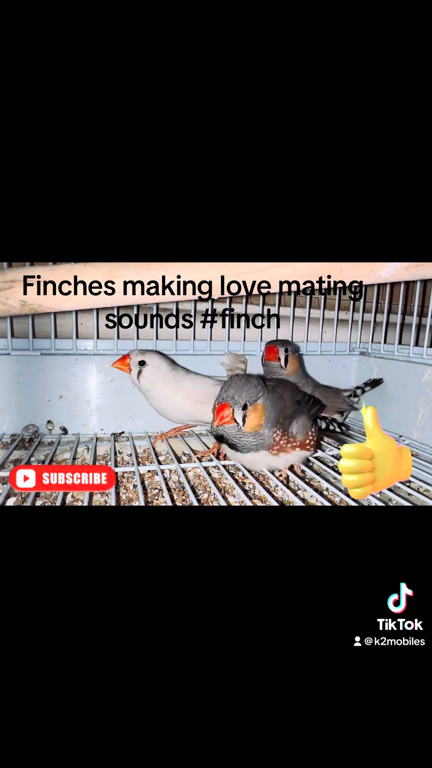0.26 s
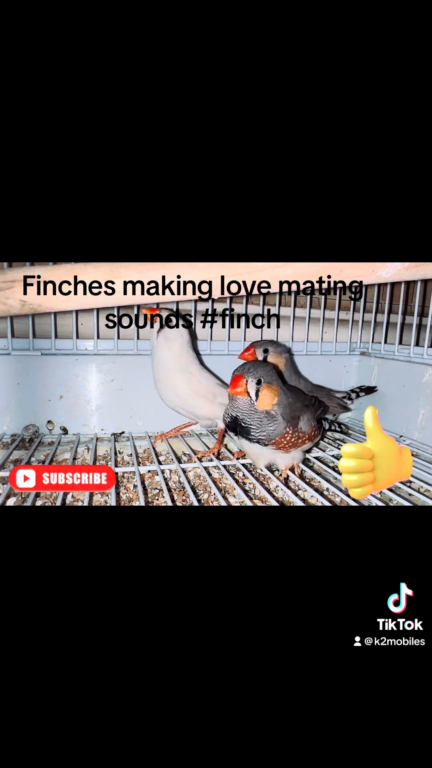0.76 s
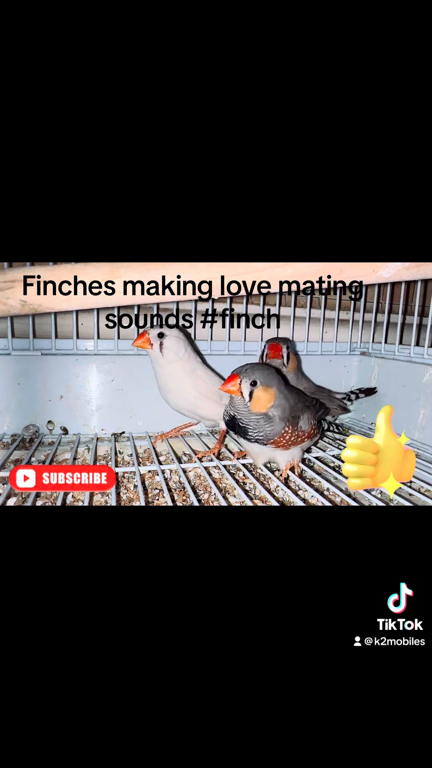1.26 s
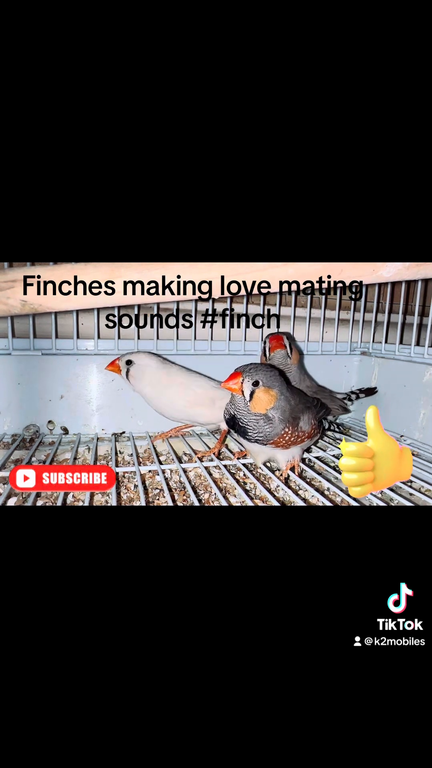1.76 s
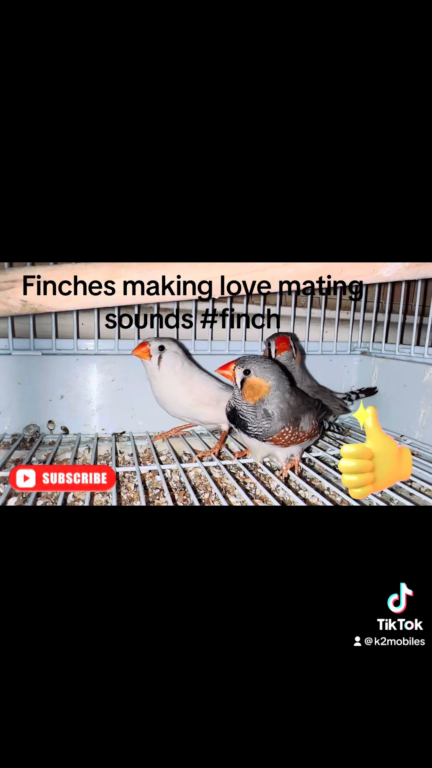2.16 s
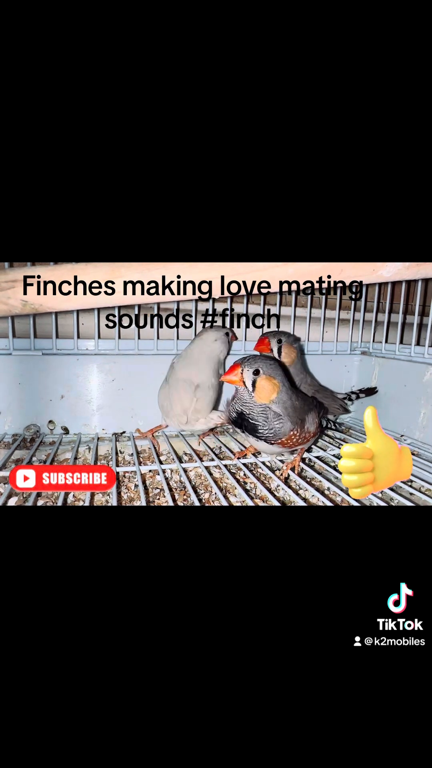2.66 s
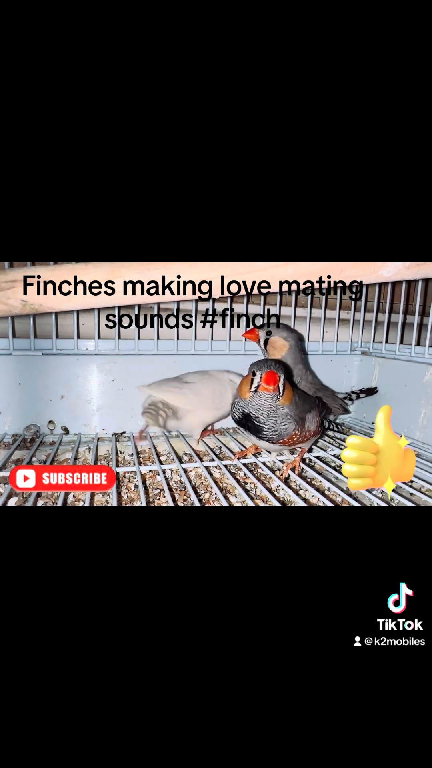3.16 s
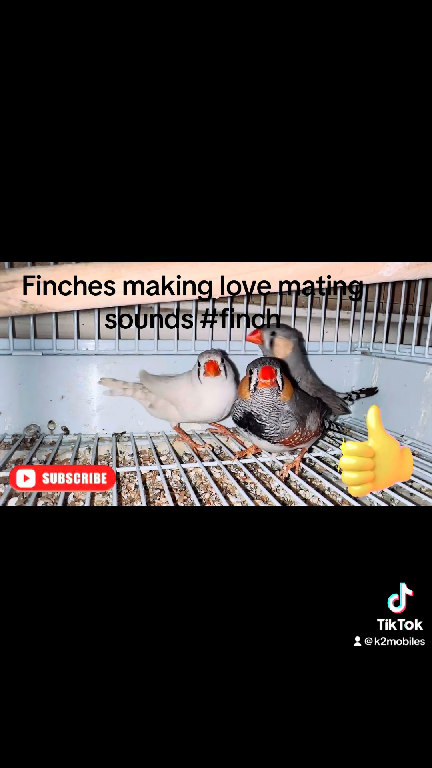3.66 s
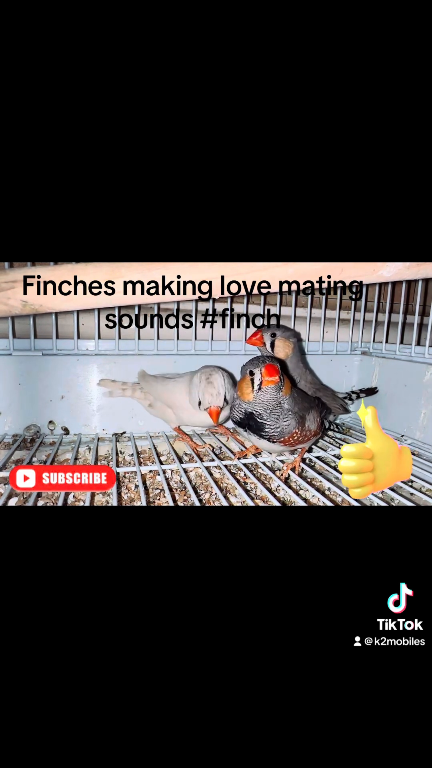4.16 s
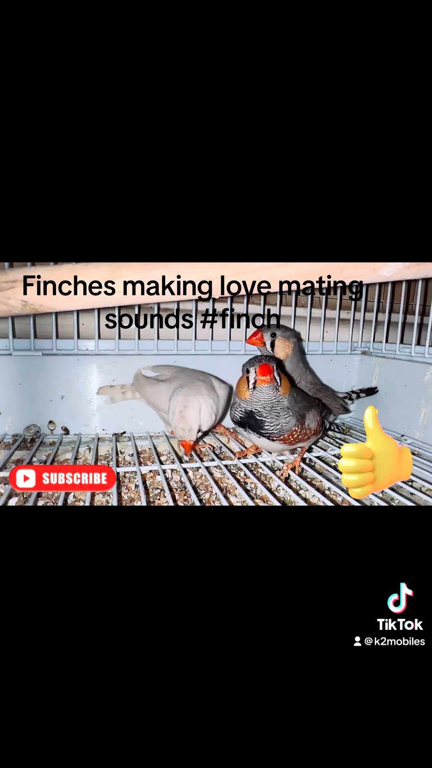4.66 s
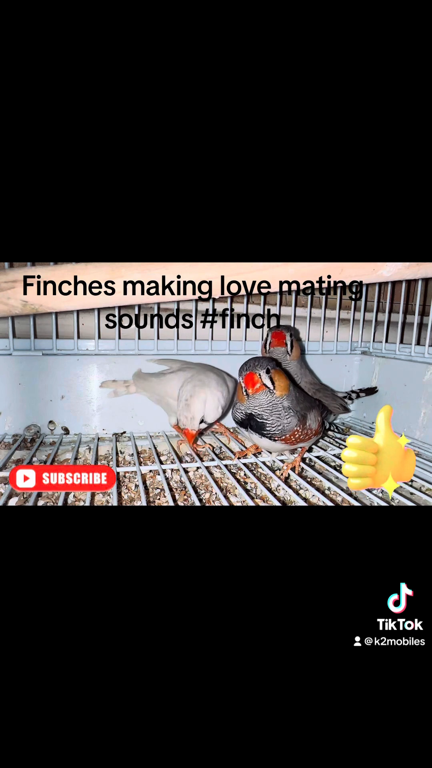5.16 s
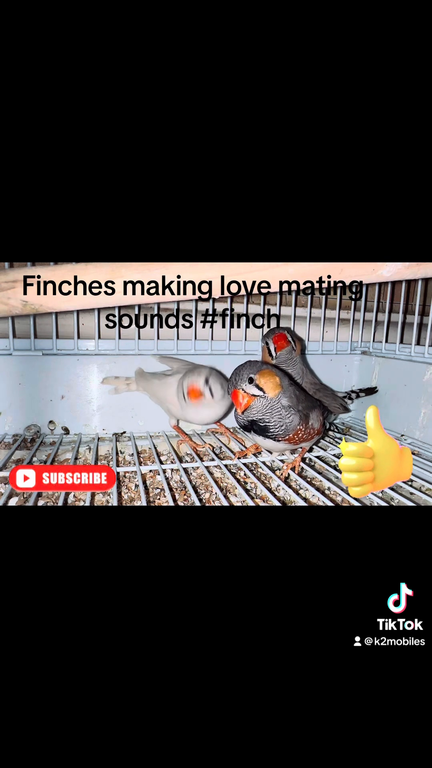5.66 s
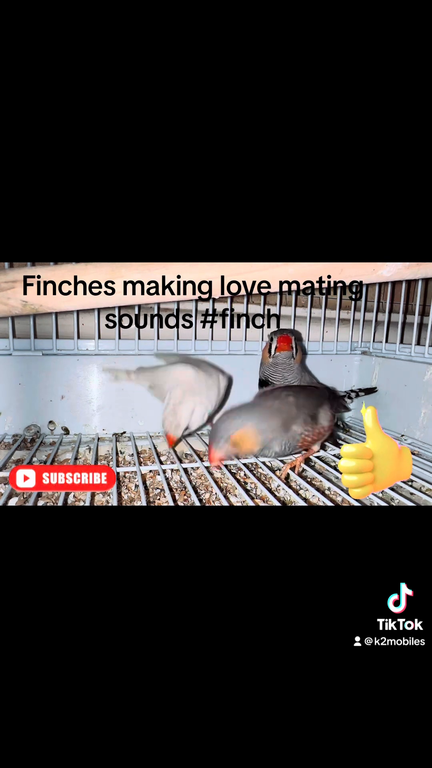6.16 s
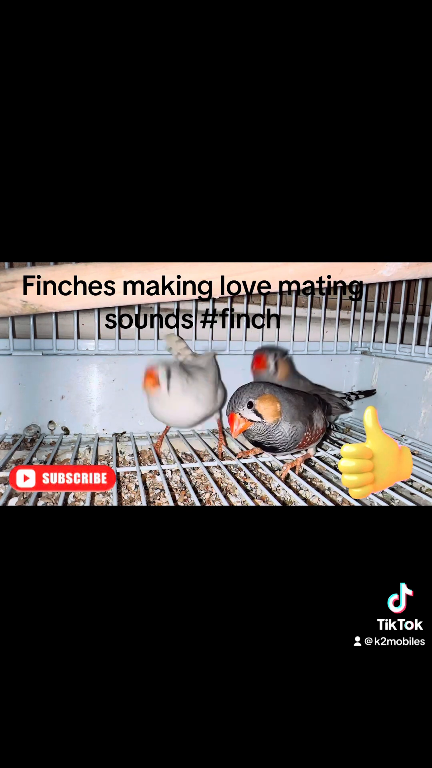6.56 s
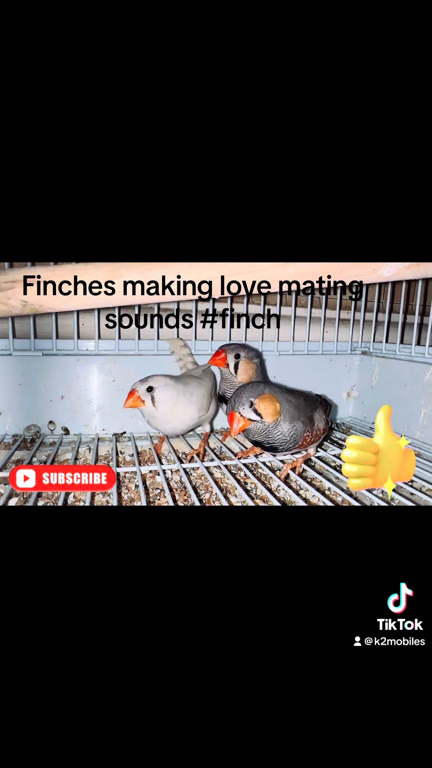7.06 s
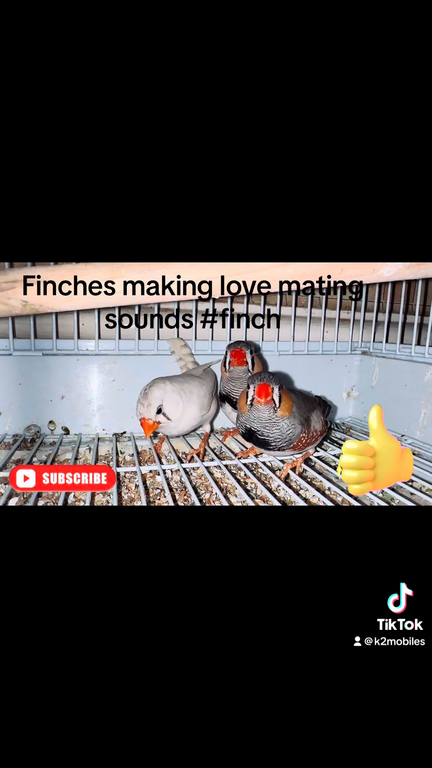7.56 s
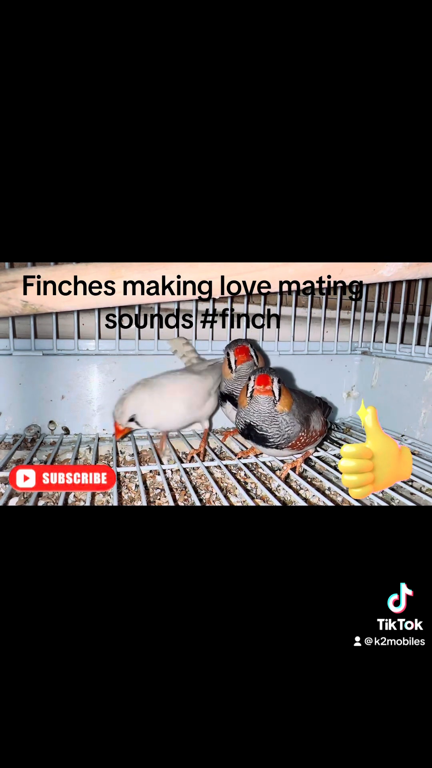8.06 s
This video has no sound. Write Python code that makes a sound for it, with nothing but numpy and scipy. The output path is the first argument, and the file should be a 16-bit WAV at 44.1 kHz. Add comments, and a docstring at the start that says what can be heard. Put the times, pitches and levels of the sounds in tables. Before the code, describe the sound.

Close up, finches hop and scrabble on a ringing wire cage floor, with brief nasal calls early on and a soft hum and floor booms beneath.

```python
"""Caged finches indoors

Small finches in a wire cage, close to a phone: nasal stacked calls and a two-voiced falling chirp (overtone
stacks with breath), hops and pings that ring the cage (damped sines), claw ticks and scrabbling (shaped noise).
Behind them a mains hum (one sine), footfalls booming through the floor (tones that beat), a low building
rumble and the hush of a small room with fading tails of cage clatter (coloured noise)."""
import sys
import numpy as np
from scipy import signal
from scipy.fft import rfft, irfft, next_fast_len
from scipy.io import wavfile
from scipy.ndimage import uniform_filter1d, map_coordinates

SR = 44100
rng = np.random.default_rng(int(sys.argv[2]) if len(sys.argv) > 2 else 0)


def master(y):
    """Save y as 16-bit WAV."""
    cut = np.clip(np.atleast_2d(y).T, -1, 1)
    pcm = np.round(cut * 32767)  # scale
    wavfile.write(sys.argv[1], SR, pcm.astype(np.int16))


N = 366912  # length in samples
TOP_HZ = 16500  # nothing sounds above this

# colour of the building's low noise: [f/Hz, level/dB]
RUMBLE_COLOUR = [(15, -53), (25, -14.5), (32, -6), (42, -11.5), (70, -10), (85, 2.5), (105, 2), (125, -4),
                 (170, -35), (300, -120)]

# colour of the hush: [f/Hz, level/dB]
HUSH_COLOUR = [(90, -47), (150, -14.5), (260, -22), (345, -22.5), (480, -33), (700, -27), (990, -35.5),
               (1890, -36), (4890, -48.5), (6370, -44), (8630, -52.5), (10800, -62), (13200, -57),
               (16500, -83.5)]
# the hush with the fading tails of cage clatter, above 300 Hz, before the lean: [t/s, level/dB]
HUSH_LEVEL = [(0.0, -72.5), (0.69, -73.5), (1.41, -77), (2.1, -76), (2.59, -75), (3.0, -75), (4.38, -77.5),
              (5.21, -73.5), (5.63, -76), (6.16, -75.5), (6.28, -62.5), (6.46, -75.5), (8.11, -76.5),
              (8.32, -70.5)]
# left-right likeness, before the lean: [f/Hz, correlation -1 to 1]
HUSH_LIKENESS = [(60, 0.38), (130, 0.71), (290, 0.98), (640, 0.21), (1410, -0.25), (3100, 0.094),
                 (6820, -0.063), (15000, -0.59)]
# left over right: [f/Hz, level/dB]
HUSH_LEAN = [(60, -0.5), (130, 2), (290, 1), (640, -1.0), (1410, 4.5), (3100, 5), (6820, 9), (15000, -9)]
# how much it comes and goes: [f/Hz, depth/dB]
HUSH_PATCHES = [(200, 4.5), (800, 2.5), (2500, 0.5)]

# footfalls and jolts through the floor: [t/s of the peak, level/dB, t60/s]
THUDS = [(.005, -57, 0.51), (.18, -57, .6), (0.339, -53.5, 2), (0.721, -53.5, 5.2), (1.27, -54.5, 0.93),
         (1.779, -66, 0.81), (2.22, -63, 0.53), (2.619, -55.5, .7), (2.99, -43.5, 1.8), (3.55, -43.5, 1.7),
         (4.099, -45.5, 2.7), (4.692, -52.5, 3.2), (5.011, -47, 0.075), (5.1, -57, 0.31),
         (5.4, -50.5, 0.95), (5.79, -52.5, 2.4), (6.331, -53, 1), (6.7, -55, 0.27), (6.839, -57, 1.1),
         (7.412, -48.5, 2), (8.02, -40.5, 1.9), (8.085, -41, 0.87)]
# two close tones that beat, and a deep push: [f/Hz, level/dB, share of the thud's t60]
FLOOR_TONES = [(56.36, -4, 0.79), (62.87, -9.5, 1), (35.8, -11.5, 0.34)]
FLOOR_SCATTER_HZ = 0.6  # the tones shift a little from step to step
THUD_RISE_S = 0.23  # time to climb 60 dB
MURMUR_DB, MURMUR_SWING_DB = -70, 4.5  # the faint restless boom between thuds

# scrabbling feet and feathers: [t/s of the peak, treble level/dB, body level/dB, body t60/s]
SCRABBLE_BURSTS = [(.005, -70, -63, 1.4), (.09, -70.5, -80, 0.38), (.13, -66.5, -63.5, 0.27),
                   (.149, -77, -47.5, 0.14), (0.255, -82, -56.5, 0.12), (0.474, -76.5, -64.5, .5),
                   (.506, -69, -76, .06), (.696, -60.5, -51.5, 0.19), (1.588, -70.5, -72.5, 0.31),
                   (2.38, -76.5, -92, 0.034), (2.457, -55, -55.5, 0.28), (2.478, -53.5, -48.5, 0.46),
                   (2.534, -56.5, -58, 0.047), (2.98, -83, -66.5, .15), (3.044, -87, -68.5, 0.09),
                   (3.19, -71.5, -62, 1.06), (3.275, -61, -55.5, 0.089), (3.287, -75, -51, 0.078),
                   (4.55, -59, -51, 0.077), (4.63, -76.5, -74, .09), (4.954, -80.5, -60.5, 1.1),
                   (5.067, -70, -66.5, 0.094), (5.162, -88, -83, 0.071), (5.329, -69.5, -55, 0.21),
                   (5.484, -67.5, -84, 0.082), (6.11, -75, -62.5, 0.71), (6.146, -67, -47.5, .03),
                   (6.17, -63.5, -61, 0.92), (6.2, -66, -66.5, 0.41), (6.222, -58, -46.5, .07),
                   (6.239, -65, -56.5, 0.2), (6.558, -76, -75.5, .6), (6.62, -77.5, -68, 0.67),
                   (6.674, -58, -61, 0.13), (6.806, -77, -70.5, .4), (6.87, -94, -60, 0.45),
                   (6.908, -40.5, -47.5, 0.062), (6.925, -67.5, -66, 0.22), (8.09, -57.5, -58.5, .8),
                   (8.128, -60, -46.5, 0.048), (8.165, -69, -84, .15), (8.202, -72, -41, 0.13)]
# colour of the scrabble's treble as heard, thin around 11 kHz: [f/Hz, level/dB]
TREBLE_COLOUR = [(2350, -11.5), (4000, -15), (4420, -11.5), (5130, -10), (8910, -13.5), (11300, -35),
                 (12500, -15), (15100, -9.5), (16000, -27), (16500, -38.5)]
# colour of the scrabble's duller body: [f/Hz, level/dB]
BODY_COLOUR = [(290, 0.5), (500, 1.5), (616, -7.5), (994, -6), (1240, -1.5), (1660, -9.5), (2080, -6.5),
               (2730, -19), (4000, -24), (5200, -60.5), (8800, -120)]
SCRABBLE_RISE_S, TREBLE_FADES = 0.032, 0.52  # time to climb 60 dB; t60 of the treble over that of the body
SMOOTH = 90  # samples over which a burst rounds off

# claws and beaks on the wires: [t/s, level/dB, centre f/Hz, hiss t60/s, knock level/dB, left-right level/dB]
TICKS = [(0.0194, -54, 14800, 0.068, -5, 4), (0.1281, -47, 7250, 0.092, -13, -2),
         (0.5013, -46.5, 6440, 0.054, -4, -2.5), (1.3904, -57, 5370, 0.042, -5, 5),
         (1.5924, -52.5, 6120, 0.047, -6, 1), (2.2435, -59.5, 7460, 0.03, -13, 2),
         (2.265, -58, 8200, 0.03, -5, 6), (2.2914, -64, 6630, 0.03, -8, 0.5),
         (2.378, -59, 7450, 0.03, -12, 0.5), (2.4573, -36, 15600, 0.042, -20, 1),
         (3.2731, -32.5, 7100, 0.02, -8, 4.5), (3.2974, -49.5, 6000, 0.025, -4, 8),
         (3.3362, -46, 6150, 0.027, 3, 9.5), (4.545, -40, 5330, 0.12, -14, 6.5),
         (4.6243, -52, 6060, 0.023, -17, -1), (4.9519, -48.5, 5430, 0.12, 4.5, 3),
         (5.1635, -57, 8640, 0.03, -13, 0), (5.3283, -54.5, 6570, 0.037, 7.5, 3.5),
         (5.474, -62, 8060, 0.022, -5, -6), (6.122, -58.5, 14200, 0.03, 3, 1),
         (6.1423, -35, 7400, 0.03, -1, 8.5), (6.175, -44.5, 6500, 0.052, -20, 2),
         (6.2057, -38.5, 14900, 0.056, -11, 0), (6.2226, -27, 9460, 0.02, -7, 2.5),
         (6.254, -45, 6000, 0.036, 0, 16.5), (6.365, -50.5, 6000, 0.028, -23, 2),
         (6.4323, -54.5, 6350, 0.06, -23, 8), (6.4866, -53.5, 6540, 0.04, -37, 4),
         (6.556, -47, 6740, 0.04, -28, 5), (6.6283, -50.5, 6320, 0.052, -14, 4),
         (6.667, -43, 15300, 0.035, -4, 5.5), (6.7008, -51, 6410, 0.037, -23, 8),
         (6.81, -50.5, 6840, 0.044, 3, 0.5), (6.8543, -58, 6100, 0.03, -3, 1),
         (6.877, -53, 8250, 0.032, -5, -2), (6.9053, -31.5, 15300, 0.049, -14, 8.5),
         (7.4769, -63, 14600, 0.026, -4.5, 2), (8.0945, -51, 6900, 0.039, -10, 6),
         (8.1239, -40, 15000, 0.025, 2, 3), (8.204, -28.5, 14800, 0.015, -20, 3.5),
         (8.2223, -32.5, 7400, 0.035, -23, 3.5)]
# colour of the ticks as heard, thin around 11 kHz: [f/Hz, level/dB]
TICK_COLOUR = [(590, -16), (1000, 13.5), (1910, 8.5), (3330, -10), (5350, -13.5), (6690, -9.5), (7350, -14),
               (9650, -13), (11500, -29.5), (15100, -11), (16800, -27)]
# modes of a perch rapped hard: [f/Hz, level/dB, t60/s]
KNOCK_MODES = [(1250, 6.5, 0.025), (1942, 9, 0.022), (2530, 0, 0.028), (3980, -14.5, 0.01)]

# landings on the wire floor:
# [t/s, level/dB, centre f/Hz, scuffle decay/s, tray boom level/dB, left-right level/dB]
HOPS = [(0.022, -54, 496, 0.0048, -5, -6.5), (0.088, -59, 1500, 0.0098, -27, -7),
        (0.147, -34.5, 1310, 0.0014, -19.5, -1), (0.255, -28, 763, 0.011, -19.5, -1),
        (0.471, -48, 589, 0.014, -5, 0), (0.5, -48, 486, 0.016, -8, -3),
        (0.694, -29.5, 642, 0.0046, -22, -2), (1.585, -70, 1480, 0.009, -14, -1),
        (2.439, -54, 1220, 0.0038, -18, 4), (2.462, -45.5, 1520, 0.0086, -34, 0),
        (2.498, -35.5, 1220, 0.012, -20, 5), (2.522, -37, 590, 0.0053, -26.5, -3.5),
        (2.538, -44.5, 2200, 0.014, -15, -0.5), (3.185, -38, 710, 0.01, -28, 2),
        (3.197, -56, 859, 0.029, -16, -4.5), (3.219, -51.5, 710, 0.007, -20, 2.5),
        (3.278, -30.5, 1134, 0.0035, -28, -1), (3.334, -46, 1350, 0.0027, -11.5, 2.5),
        (4.553, -41, 466, 0.0041, -13, -2.5), (4.955, -34.5, 763, 0.014, -4.5, -2),
        (5.062, -37.5, 574, 0.0091, -6, -2.5), (5.151, -54, 504, 0.012, -15, -5),
        (5.33, -41.5, 640, 0.0089, -11.5, -3.5), (5.473, -61, 985, 0.013, -23, 2),
        (6.1, -49, 900, 0.013, -10.5, -0.5), (6.141, -36.5, 1790, 0.0019, -20, -11),
        (6.181, -44, 1170, 0.007, -10, -0.5), (6.205, -43, 2470, 0.008, -36, -3),
        (6.22, -35.5, 1240, 0.0028, -49, 6.5), (6.238, -66, 1210, 0.0082, -6, -4),
        (6.252, -53.5, 1160, 0.0071, -15, -9), (6.277, -36, 900, .005, -13, 0.5),
        (6.284, -31, 570, 0.0063, -13.5, -2), (6.294, -39.5, 797, 0.0041, -15, 6),
        (6.608, -56, 1270, 0.0055, 10, 3), (6.634, -37.5, 1185, 0.0052, -19.5, -2),
        (6.667, -35.5, 785, 0.002, -29, 3.5), (6.809, -50, 501, 0.0037, -31, 2.5),
        (6.865, -53.5, 533, 0.011, -25, 2), (6.881, -43, 1250, 0.0089, -36, 1),
        (6.899, -35, 810, 0.0023, -33, 2), (8.093, -49, 616, 0.0056, -25, 2),
        (8.122, -41.5, 610, 0.0072, -11, 0), (8.142, -45.5, 2090, 0.0098, -12, -4.5),
        (8.197, -34.5, 623, 0.015, -5, 1), (8.219, -44, 589, 0.0038, -7, -9.5)]
# modes of the wire floor and bars: [f/Hz, level/dB, t60/s]
CAGE_MODES = [(334.3, -6, 0.31), (435.3, 6.5, 0.055), (467, -4, 0.026), (593, -5.5, 0.081),
              (660, 0.5, 0.038), (710, -3.5, 0.028), (858, -0.5, 0.027), (863, -2.5, 0.078),
              (940, -11.5, 0.031), (1034, -5.5, 0.045), (1193.6, 3.5, 0.045), (1260, -19.5, 0.034),
              (1450, -14.5, 0.018), (1520, -7.5, 0.045), (1540, -32.5, 0.027), (1898, -1, 0.041),
              (2060, -36.5, 0.21), (2640, -28, 0.058), (2460, -5.5, 0.041), (3200, -19, 0.16)]
# modes of the tray: [f/Hz, level/dB, t60/s]
TRAY_MODES = [(171.2, -13, 0.15), (209.4, 1.5, 0.14), (270.4, -6.5, 0.17)]

# clearest single rings of the cage, many sounding with a landing: [f/Hz, t60/s, blows as (t/s, level/dB)]
PINGS = [(446, 0.13, [(4.553, -44), (4.957, -38.5), (5.063, -61)]), (600, 0.05, [(2.521, -35.5)]),
         (713, 0.086, [(.257, -31), (.695, -35)]), (970, 0.065, [(8.196, -38)]),
         (1234, 0.053, [(3.278, -35.5), (6.634, -37.5)]), (1337, 0.38, [(.15, -54.5), (.258, -56.5),
         (.696, -64.5), (3.336, -70)]), (1860, 0.026, [(6.141, -36)]), (2470, .036, [(6.205, -46)]),
         (2087, 0.3, [(3.28, -58), (8.102, -56), (8.125, -57), (8.235, -59)])]

# overall colour of the calls as heard, nearly empty around 11 kHz: [f/Hz, level/dB]
CALL_COLOUR = [(300, -7), (540, -18), (1090, -5.5), (1630, -7.5), (2200, -1), (2750, -5), (3300, -10.5),
               (3850, -12.5), (4400, -14), (5400, -25), (6500, -26), (7300, -30), (9300, -36.5),
               (10800, -78), (13500, -48)]
# stacked calls: [t/s, length/s, opening/s, step/s, opening f/Hz, top f/Hz, level/dB at mid-call,
#  breath level/dB, pitch jitter 0-1, overtone tilt/dB per octave, odd overtones level/dB,
#  beak ring near 4.4 kHz level/dB, bright onset level/dB, left-right level/dB]
STACKED_CALLS = [(.581, 0.1, .023, 0.014, 530, 570.7, -41.5, -21, 0.01, -1, -4, 4, 16, 2.5),
                 (1.681, 0.092, .02, .013, 513, 566, -41, -22, 0, -1, 0.5, -4, 7.5, 4.5),
                 (1.825, 0.07, .008, .032, 493, 539.5, -44.5, -25, 0.02, -4.5, -2.5, 5.5, 14, 4),
                 (2.464, .1, .022, 0.01, 511.5, 564.4, -44.5, -14.5, 0.01, 0.5, 1.5, 0.5, 3, 1)]
SAG_SHARE, SAG_BEND = 0.0984, 1.64  # after the step up the pitch droops by this share, ever faster
ATTACK_S, RELEASE_S, EDGE_DB = 0.0088, 0.0079, 26  # fade at both ends
SWELL_DB_PER_S = 25  # slow growth between them
# the falling chirp, upper and lower voice: [t/s, f/Hz, level/dB]
CHIRP = [
    [(2.095, 776, -57.5), (2.101, 1035, -50.5), (2.108, 1278, -45), (2.115, 1256, -38), (2.13, 1045, -40.5),
     (2.142, 797, -48), (2.156, 628, -40.5), (2.166, 535, -52), (2.174, 458, -52.5)],
    [(2.11, 682, -75), (2.12, 694, -54), (2.136, 682, -39), (2.15, 646, -85)],
]
# its voices: [breath level/dB, pitch jitter 0-1, overtone tilt/dB per octave, odd overtones level/dB,
#  beak ring level/dB, bright onset level/dB, left-right level/dB]
CHIRP_VOICES = [(-10, 0.025, -6.5, -1, -4, 0, 2.5), (-13, 0.14, -3, 2.5, 0.5, 0, -2)]

# cage at the two microphone ports, left over right: [f/Hz, level/dB]
PORT_LEAN = [(60, -8.5), (110, 9), (200, 2), (380, 0), (700, 9.5), (1290, 2.5), (2380, -1), (4400, 5.5),
             (8120, 0.5), (15000, -3)]
# phase by which left leads: [f/Hz, phase/rad]
PORT_LEAD = [(0, 4.5), (1210, -1.65), (1640, 1.24), (2840, 1.3), (4480, 7.5), (6290, 8.0), (10100, 4.5),
             (12200, -21.5), (13200, -0.5), (16600, -2)]
# decay of the room: [f/Hz, t60/s]
ROOM_DECAY = [(150, 1), (420, 0.38), (1000, 0.2), (4000, 0.26), (12000, 0.14)]


def amp(db):
    """Decibels to gain."""
    return 10 ** (np.asarray(db) / 20)


def unit(x):
    """Scales to an rms of one."""
    return x / np.sqrt(np.mean(x ** 2) + 1e-20)


def peak(x):
    """Scales to a peak of one."""
    return x / np.abs(x).max()


def along(points, hz):
    """Reads (Hz, value) points on a log frequency axis."""
    f, v = np.transpose(points)
    return np.interp(np.log(hz + 1), np.log(f + 1), v)


def curve(rows):
    """One value per sample from (s, value) rows."""
    return np.interp(np.arange(N) / SR, *np.transpose(rows))


def wobble(rate, size=N):
    """A smooth random curve, rate knots a second."""
    knots = rng.standard_normal(int(size * rate / SR) + 4)
    return map_coordinates(knots, [np.arange(size) * rate / SR])


def filtered(x, response):
    """Shapes x by a response of frequency, real or complex."""
    n = x.shape[-1]
    m = next_fast_len(n + 4096)
    return irfft(rfft(x, m) * response(np.fft.rfftfreq(m, 1 / SR)), m)[..., :n]


def add(pair, s, x, pan_db):
    """Mixes a sound into both channels at a time."""
    part = pair[:, round(s * SR):][:, :len(x)]
    part += amp([[pan_db / 2], [-pan_db / 2]]) * x[:part.shape[1]]


def track(pieces):
    """Sums (start s, sound) pieces into one track; a piece may start up to a second early."""
    out = np.zeros((2, N + SR))
    for s, x in pieces:
        add(out, s + 1, x, 0)
    return out[0, SR:]


def swell(rise, t60):
    """Times around a peak, and the gain of a burst that climbs to it and dies away."""
    t60 = np.clip(t60, .01, 4)
    u = np.arange(-round(rise * SR), round(t60 * SR)) / SR
    return u, amp(-60 * np.where(u < 0, -u / rise, u / t60))


def ringing(modes, t, lift_db):
    """Modes of a struck body: damped sines, each at a new strength and sign."""
    hz, level_db, t60 = np.transpose(modes)[:, :, None]
    strength_db = level_db + lift_db(hz) + rng.normal(0, 2.5, hz.shape)
    gain = amp(strength_db - 60 * t / np.clip(t60, .005, .6))
    return np.sum(gain * rng.choice([-1, 1], hz.shape) * np.sin(2 * np.pi * hz * t), axis=0)


def hum():
    """Twice the mains frequency, wavering a little in strength."""
    t = np.arange(N) / SR
    waver_db = 1.2 * wobble(8)
    return amp(-53.5 + waver_db) * np.sin(2 * np.pi * 100.2 * t)


def rumble():
    """The building's low noise, coming and going."""
    noise = rng.standard_normal(N) * amp(3 * wobble(6))
    return amp(-63.5) * unit(filtered(noise, lambda f: amp(along(RUMBLE_COLOUR, f))))


def hush():
    """Room noise and fading clatter tails as one patchy noise, partly alike at the two ports."""
    hz, _, z = signal.stft(rng.standard_normal((2, N)), SR, nperseg=512)
    field = uniform_filter1d(rng.standard_normal(z.shape[1:]), size=3, axis=0)
    field = uniform_filter1d(field, size=24, axis=1)
    patches = amp(along(HUSH_PATCHES, hz)[:, None] * unit(field))
    pair = signal.istft(z * patches, nperseg=512)[1][:, :N]
    # the mid-to-side balance sets the likeness
    turn = lambda f: np.arccos(np.clip(along(HUSH_LIKENESS, f), -1, 1)) / 2
    mid, side = filtered(pair, lambda f: amp(along(HUSH_COLOUR, f)) * [np.cos(turn(f)), np.sin(turn(f))])
    lean = lambda f: amp(np.outer([.5, -.5], along(HUSH_LEAN, f)))
    air = filtered(np.array([mid + side, mid - side]), lean)
    return amp(curve(HUSH_LEVEL)) * air / np.std(filtered(mid, lambda f: f > 300))


def thuds():
    """Each footfall sets the floor's tones going in step; between them it murmurs, its pitch wandering."""
    hz = 59 + 4 * wobble(5.2)
    murmur_gain = amp(MURMUR_DB + MURMUR_SWING_DB * wobble(7.4))
    murmur = murmur_gain * np.sin(2 * np.pi * np.cumsum(hz) / SR)
    pieces = []
    for s, db, t60 in THUDS:
        phase = rng.uniform(0, 2 * np.pi)
        for tone_hz, tone_db, share in FLOOR_TONES:
            u, gain = swell(THUD_RISE_S, share * t60)
            tone = np.sin(2 * np.pi * rng.normal(tone_hz, FLOOR_SCATTER_HZ) * u + phase)
            pieces.append((s + u[0], amp(db + tone_db) * gain * tone))
    return np.sqrt(2) * (murmur + track(pieces))  # levels count as rms


def scrabble():
    """Grainy rustle of feathers and claws and a duller rattle of the wires, both in uneven lumps."""
    lumps = amp(3 * wobble(400) + 3 * wobble(60))

    def grains(colour):
        return unit(filtered(rng.standard_normal(N) * lumps, lambda f: amp(along(colour, f))))

    def burst(s, db, t60):
        return s - SCRABBLE_RISE_S, amp(db) * swell(SCRABBLE_RISE_S, t60)[1]

    treble = track(burst(s, db, TREBLE_FADES * t60) for s, db, _, t60 in SCRABBLE_BURSTS)
    body = track(burst(s, db, t60) for s, _, db, t60 in SCRABBLE_BURSTS)
    rustle = uniform_filter1d(treble, size=SMOOTH) * grains(TREBLE_COLOUR)
    rattle = uniform_filter1d(body, size=SMOOTH) * grains(BODY_COLOUR)
    return rustle + rattle


def ticks():
    """A sharp crack and a fast-dying hiss, coloured around each tick's centre, over a short knock."""
    out = np.zeros((2, N))
    t = np.arange(-128, SR // 8) / SR  # a little silence ahead of the contact
    for s, db, centre_hz, t60, knock_db, pan_db in TICKS:
        decay = amp(-60 * t / 0.0013) + 0.16 * amp(-60 * t / max(t60, .005))  # crack, then hiss
        burst = rng.standard_normal(len(t)) * (t >= 0) * decay
        near_db = lambda f: -9.5 * np.log2((f + 20) / centre_hz) ** 2
        tick = filtered(burst, lambda f: amp(along(TICK_COLOUR, f) + near_db(f)))
        knock = (t >= 0) * ringing(KNOCK_MODES, np.abs(t), lambda f: 0)
        add(out, s + t[0], amp(db) * (peak(tick) + amp(knock_db) * peak(knock)), pan_db)
    return out


def hops():
    """Each landing is a short scuffle of toes that rings the wires near its centre and booms the tray."""
    out, t = np.zeros((2, N)), np.arange(SR // 2) / SR
    u = t[:SR // 8]
    for s, db, centre_hz, scuffle, boom_db, pan_db in HOPS:
        near_db = lambda f: -8 * np.log2((f + 20) / centre_hz) ** 2
        contact = (1 - np.exp(-u / 0.0015)) * np.exp(-u / max(scuffle, 5e-4))
        toes = rng.standard_normal(len(u)) * amp(2.5 * wobble(351, size=len(u))) * contact
        toes[:16] += .15 * np.linalg.norm(toes) * np.hanning(16)  # the first touch is one firm push
        blow = peak(signal.fftconvolve(toes, ringing(CAGE_MODES, t, near_db))[:len(t)])
        scrape = contact * filtered(rng.standard_normal(len(u)), lambda f: amp(near_db(f)))
        blow[:len(u)] += 0.48 * peak(scrape)
        boom = (1 - np.exp(-t / 0.012)) * ringing(TRAY_MODES, t, lambda f: 0)
        add(out, s, amp(db) * (peak(blow) + amp(boom_db) * peak(boom)), pan_db)
    return out


def pings():
    """The cage's clearest single rings: decaying sines, a little unsteady in phase and strength."""
    out, t = np.zeros((2, N)), np.arange(SR // 2) / SR
    for hz, t60, blows in PINGS:
        for s, db in blows:
            tone = np.sin(2 * np.pi * hz * t + 1.21 * wobble(41, size=len(t)))
            tone *= amp(2.8 * wobble(27, size=len(t)))
            add(out, s, amp(db - 60 * t / t60) * (1 - np.exp(-t / 0.00045)) * tone, 0)
    return out


def voice(t, pitch, level, breath_db, jitter, tilt_db, odd_db, beak_db, onset_db):
    """An overtone stack on the pitch, in the colour of the calls, with breath that puffs once a cycle."""
    hz = uniform_filter1d(pitch, size=200) * (1 + jitter * wobble(412, size=len(t)))
    phase = 2 * np.pi * np.cumsum(hz) / SR
    k = np.arange(1, 29)[:, None]  # overtone numbers
    colour_db = lambda f: along(CALL_COLOUR, f) + beak_db * np.exp(-((f - 4400) / 700) ** 2)
    flicker_db = 2.4 * np.array([wobble(40, size=len(t)) for _ in k])
    # the start is shrill
    attack_db = onset_db * np.exp(-(t - t[0]) / 0.041) * np.clip(np.log2(k * hz / 3500), 0, 1)
    slope_db = tilt_db * np.log2(k * hz / 2000) + odd_db * (k % 2)
    gains = (k * hz < TOP_HZ) * amp(colour_db(k * hz) + slope_db + attack_db + flicker_db)
    stack = np.sum(gains * np.sin(k * phase + rng.uniform(0, 2 * np.pi, k.shape)), axis=0)
    stack /= np.sqrt(np.sum(gains ** 2, axis=0) / 2)  # even loudness at every moment
    puffs = rng.standard_normal(len(t)) * (1 + np.cos(phase))
    breath = filtered(puffs, lambda f: amp(colour_db(f) + 4 * np.log2(f / 2000 + 1e-3)))
    return amp(level) * (stack + amp(breath_db) * unit(breath))


def calls():
    """Stacked calls share one shape: low opening, step up, droop. The chirp is two voices that overlap."""
    out = np.zeros((2, N))
    for s, length, opening, step, low_hz, top_hz, db, *colour, pan_db in STACKED_CALLS:
        t = np.arange(0, length, 1 / SR)
        climb = np.clip((t - opening) / step, 0, 1)
        droop = np.clip((t - opening - step) / (length - opening - step), 0, 1) ** SAG_BEND
        pitch = low_hz + (top_hz - low_hz) * climb - SAG_SHARE * top_hz * droop
        edges = np.clip(1 - t / ATTACK_S, 0, 1) + np.clip(1 - (length - t) / RELEASE_S, 0, 1)
        level = db + SWELL_DB_PER_S * (t - length / 2) - EDGE_DB * edges
        add(out, s, voice(t, pitch, level, *colour), pan_db)
    for rows, (*colour, pan_db) in zip(CHIRP, CHIRP_VOICES):
        s, pitch, level = np.transpose(rows)
        t = np.arange(s[0], s[-1], 1 / SR)
        add(out, s[0], voice(t, np.interp(t, s, pitch), np.interp(t, s, level), *colour), pan_db)
    return out


def ports(pair):
    """The two microphone ports hear the cage with their own colour and delay."""
    lean = lambda f: amp(np.outer([.5, -.5], along(PORT_LEAN, f)))
    lead = lambda f: np.exp(1j * np.outer([.5, -.5], along(PORT_LEAD, f)))
    return filtered(pair, lambda f: lean(f) * lead(f))


def room(x):
    """Each frequency of the room's answer dies at its own speed."""
    hz, t, z = signal.stft(rng.standard_normal((2, SR // 2)), SR, nperseg=256)
    tail = signal.istft(z * amp(-60 * t / along(ROOM_DECAY, hz)[:, None]), SR, nperseg=256)[1]
    late = np.pad(x, (350, 0))[None]  # the answer comes 8 ms late
    return signal.fftconvolve(late, tail / np.linalg.norm(tail[0]), axes=1)[:, :N]


def scene():
    """Birds and cage, direct and through the room, over the low sounds and the hush."""
    birds, feet = calls(), hops() + ticks() + pings() + scrabble()
    wet = amp(-12.0) * room(birds.mean(axis=0)) + amp(-10.0) * room(feet.mean(axis=0))
    low = hum() + thuds() + rumble()
    return ports(birds + feet) + wet + low * amp([[.4], [-.4]]) + hush()


def record(dry):
    """The phone keeps nothing above its band limit."""
    return filtered(dry, lambda f: f < TOP_HZ)


dry = scene()
out = record(dry)
master(out)
```